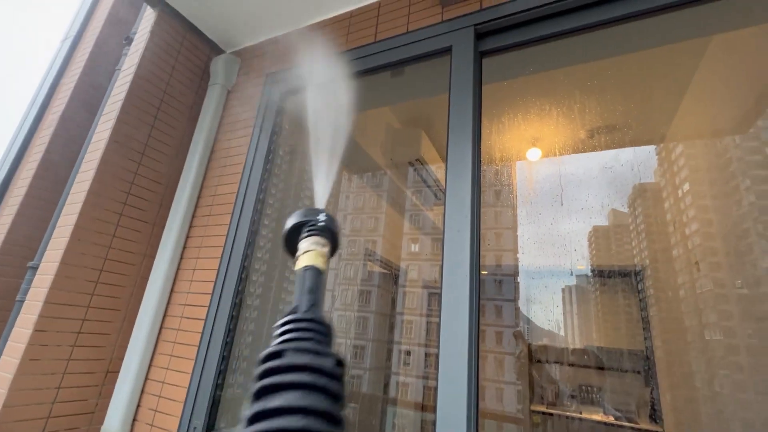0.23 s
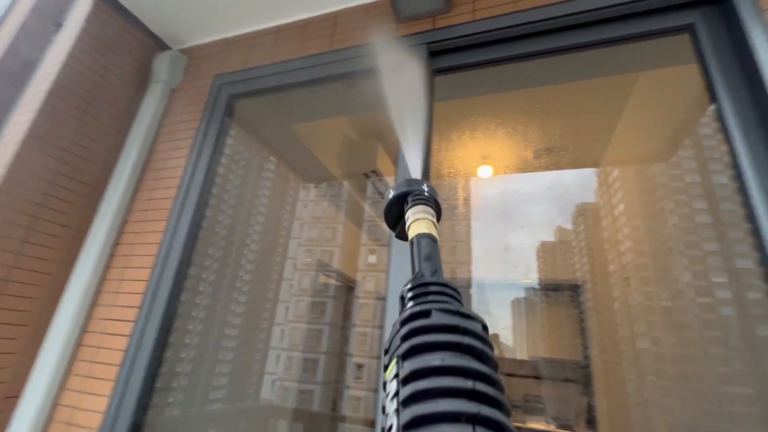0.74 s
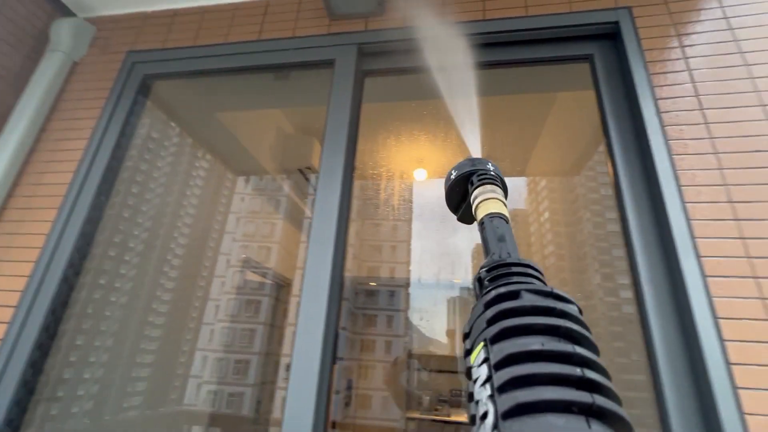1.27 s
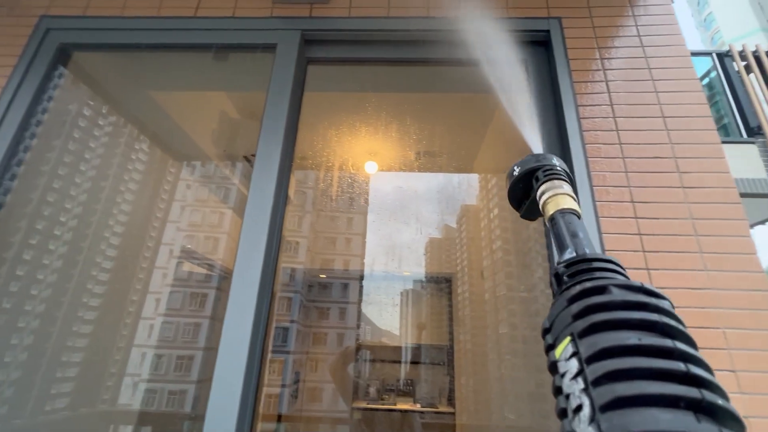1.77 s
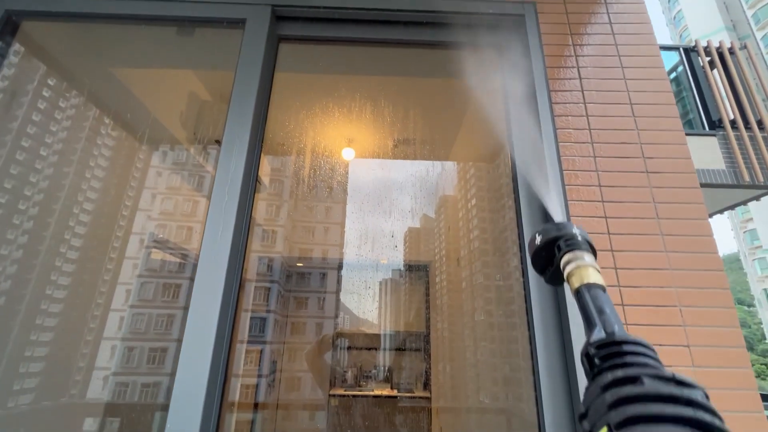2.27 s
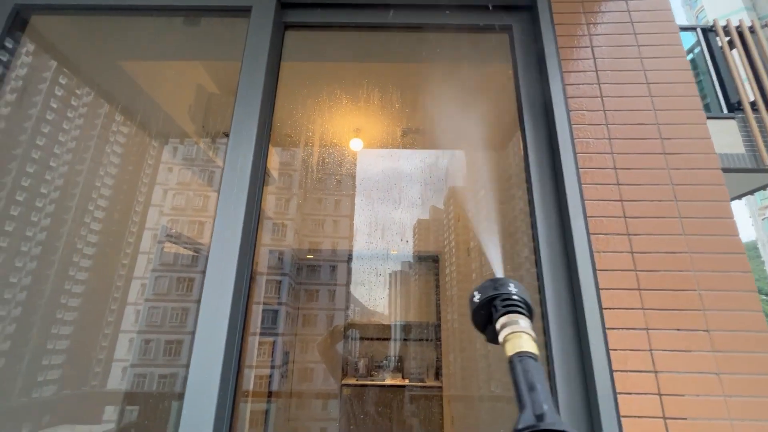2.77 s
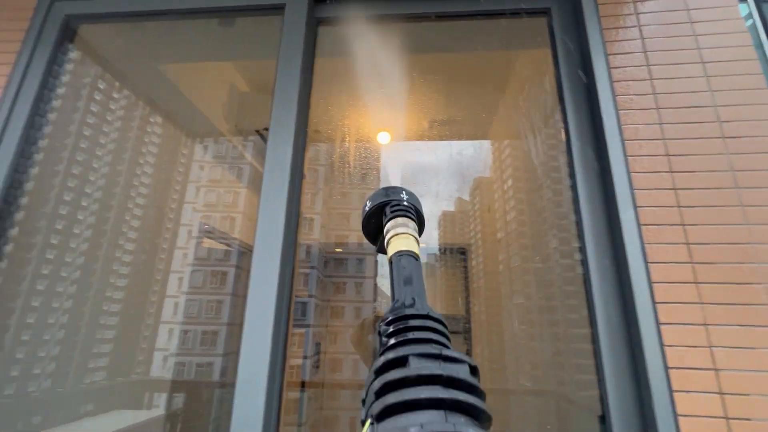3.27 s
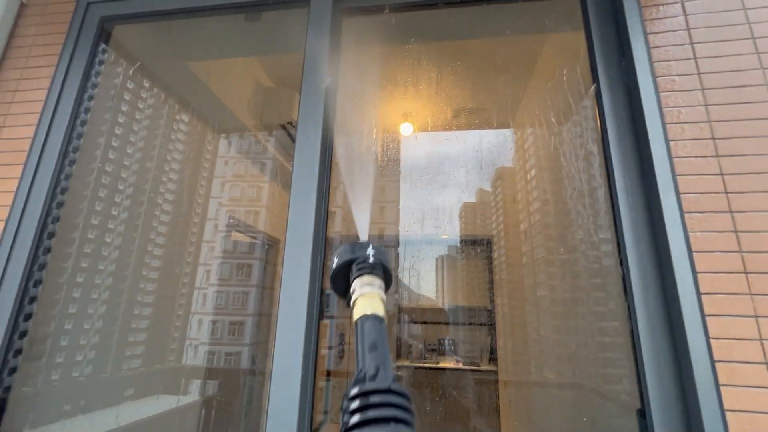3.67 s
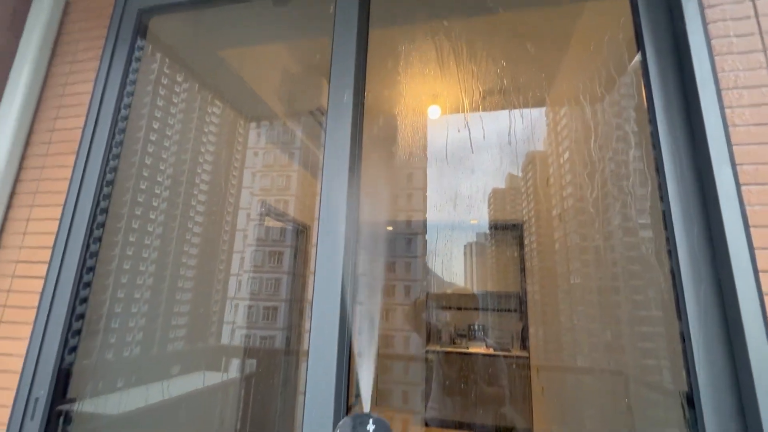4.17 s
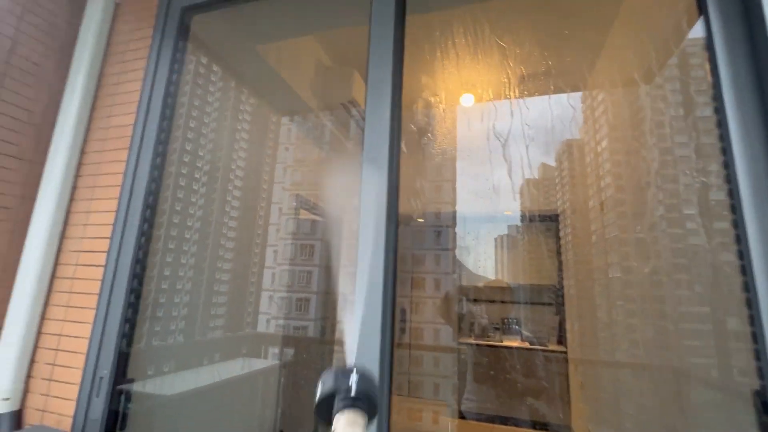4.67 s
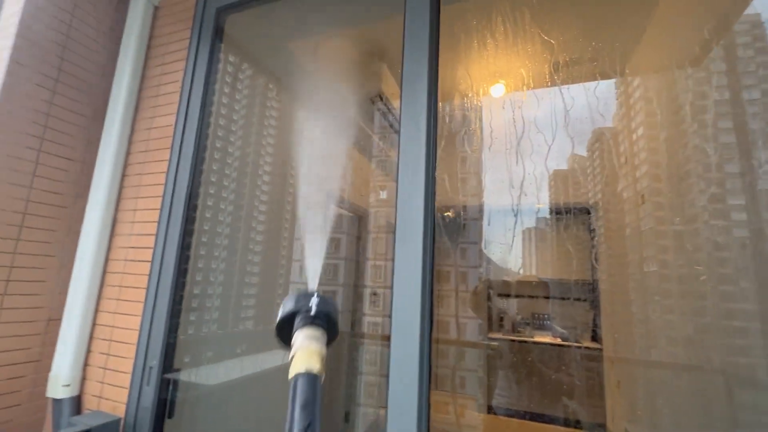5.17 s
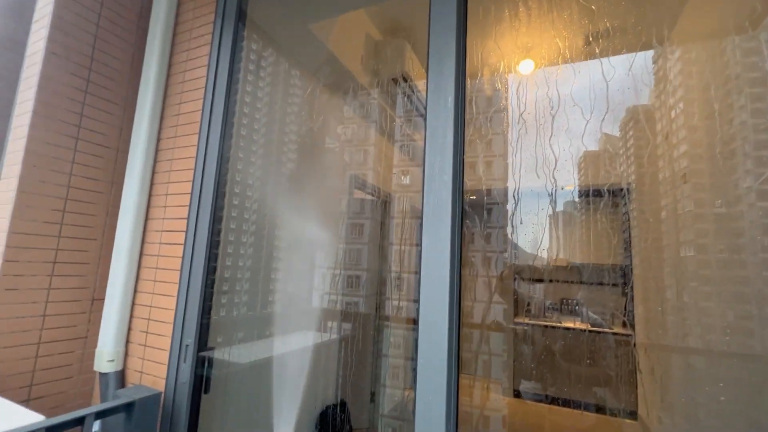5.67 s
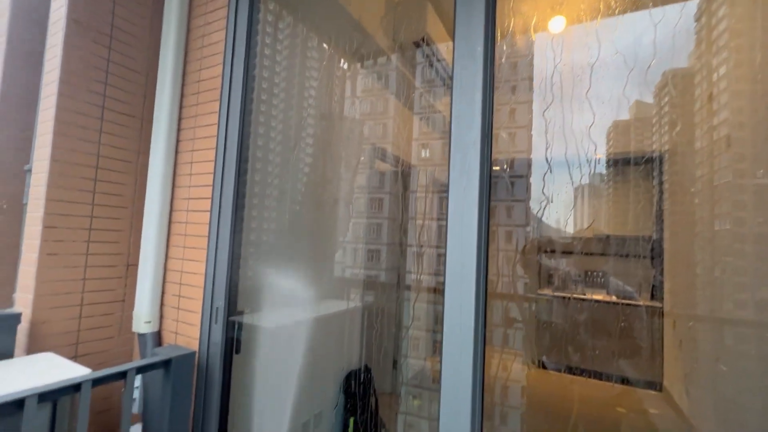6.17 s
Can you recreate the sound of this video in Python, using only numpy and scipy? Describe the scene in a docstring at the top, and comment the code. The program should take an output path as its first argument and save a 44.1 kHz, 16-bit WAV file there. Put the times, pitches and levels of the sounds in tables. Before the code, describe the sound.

Continuous pump noise and water spray, heard close outdoors by a moving stereo microphone. Rapid casing knocks alternate with brief falling whistles, one stronger than the other, over low hum, faint drone and rumble. Spray splashes brightly on a window at first, then weakens as a thin airy hiss rises. The knocking becomes duller, the whistles blurrier, and the pitch sags very slightly. Short reflections surround the machine.

```python
"""On a balcony, a two-piston electric pressure washer runs while its jet sweeps over window glass and frame.
Pump: each stroke knocks the casing, then a valve whistles briefly; the motor sounds lines locked to its speed.
Jet: shaped noise pulsing with the strokes. Behind it: stroke-rate hum, a steady drone and low rumble.
The hand-held microphone pair turns and drifts, so levels and the left-right delay change slowly.
"""
import sys
import numpy as np
from scipy import signal
from scipy.fft import rfft, irfft
from scipy.io import wavfile
from scipy.ndimage import uniform_filter1d, map_coordinates

SR = 44100
rng = np.random.default_rng(int(sys.argv[2]) if len(sys.argv) > 2 else 0)


def digitize_waveform(pressure):
    """Quantize a signal to 16-bit integers and store it at the path in sys.argv[1].

    Rows of a 2-D input are taken as channels; values are limited to [-1, 1].
    """
    field = np.atleast_2d(pressure).T
    bounded = np.clip(field, -1, 1)
    quanta = np.round(bounded * 32767).astype(np.int16)
    wavfile.write(sys.argv[1], SR, quanta)


N = 282857

# Crank speed, sagging as the battery drains: (time [s], speed [turns/s])
CRANK_SPEED = [(0.0, 28.28), (0.8, 28.13), (1.6, 27.998), (2.41, 27.907), (3.21, 27.825), (4.01, 27.699),
               (4.81, 27.66), (5.62, 27.543), (6.42, 27.473)]
# Two strokes of a turn, weaker whistle first:
# (knock angle [turn], knock level [dB], whistle angle [turn], share of whistle length [1])
STROKES = [(.04, -7, .25, .85), (.53, 0, .77, 1)]

# Microphone heading: (time [s], nominal delay of left port [ms], left minus right [dB])
HEADING = [(0, 0.084, 0.8), (.3, 0.16, .5), (.5, 0.24, -.5), (1.2, 0.25, -1), (2, 0.29, -1),
           (2.8, 0.24, -0.5), (3.6, 0.22, -.6), (4.2, 0.16, 0), (5.4, 0.16, -0.4), (6.42, 0.088, 0.8)]
# Pump as heard: (time [s], level re its average [dB])
PUMP_LEVEL = [(0, 5.5), (.25, 5.5), (.6, 6.5), (1, 4), (1.5, 3), (2, 3.5), (2.5, 1), (3, 1), (3.4, 1),
              (3.9, 0), (4.4, -1), (4.8, -3), (5.3, 0), (5.6, -4.5), (5.9, -2), (6.42, -5)]

# Motor lines and sidebands from the uneven load:
# (multiple of motor speed [1], plus multiple of crank speed [1], level [dB], column of MOTOR_LEVELS [index])
MOTOR_LINES = [(1, 0, -14, 0), (4, 0, -.5, 0), (4, -2, -9, 0), (8, -2, 0, 1), (8, 0, 0, 2), (8, 2, -8, 2),
               (16, -4, -1, 3), (16, -2, 1, 3), (16, 2, 1.5, 3), (16, 4, -4, 3)]
# Motor while the pair moves: (time [s], growl [dB], lower whine [dB], whine [dB], whizz [dB])
MOTOR_LEVELS = [(0, -49, -35, -42, -43), (.6, -50, -33, -41, -38), (1, -49, -35, -38, -37),
                (1.4, -45, -33, -35, -40), (1.8, -42, -37, -33, -41), (2.2, -46, -42, -37, -46),
                (2.6, -44, -40, -41, -45), (3, -44, -40, -40, -40), (3.4, -46, -47, -34, -39),
                (3.8, -45, -46, -40, -40), (4.2, -53, -47, -43, -39), (4.6, -59, -43, -37, -41),
                (5, -47, -40, -36, -35), (5.4, -58, -42, -42, -45), (5.8, -60, -43, -39, -54),
                (6.42, -63, -41, -41, -52)]
MOTOR_TURNS_PER_CRANK_TURN = 60 / 7

HUM_DB, HUM_DB_PER_PUMP_DB = -46.5, 0.33
DRONE_HZ, DRONE_DB = 131.3, -55
# Rumble spectrum, relative: (frequency [Hz], density [dB per Hz])
RUMBLE_SPECTRUM = [(20, -36), (45, -9.5), (100, -13), (200, -14.5), (400, -12.5), (800, -37)]
RUMBLE_DB = -48.5

# Jet: (time [s], splash on pane and frame re its average [dB], nozzle hiss re its average [dB])
JET_LEVELS = [(0, 6, -3), (.3, 6, -6), (.9, 5, -2), (1.4, 4, -1.5), (2, 2.5, -0.5), (2.5, 1, 1),
              (3.05, 2, 1), (3.6, 2.5, 0.5), (4, 1, 1), (4.5, -1, 6), (4.9, 1, 2.5), (5.3, 0, 3),
              (5.6, -2.5, 8), (6.42, -4.5, 10.5)]
# Spray spectrum, relative: (frequency [Hz], density [dB per Hz])
SPRAY_SPECTRUM = [(200, -25), (500, -9.5), (900, -3.5), (1250, 11), (1550, 13), (1850, 11), (2100, 6.5),
                  (2700, 5.5), (3600, 3.5), (5200, -4.5), (6000, 2), (6800, -4.5), (7300, -3.5),
                  (9000, -7.5)]
# How the spectrum follows the splash: (frequency [Hz], change [dB per dB of splash])
SPLASH_SHARE = [(200, -0.5), (850, 1.44), (1150, 1), (1500, 0.62), (2000, 0.86), (2500, 0.84), (3700, 0.62),
                (4600, 0.88), (6000, 0.47), (8500, 1.94), (11000, 1.5)]
# Splash ring, lower off axis: (heading delay [ms], centre [Hz], boost [dB])
SPLASH_RING = [(.09, 4560, 8), (.16, 4510, 7), (.19, 4150, 4.5), (.22, 3900, 4), (.28, 3880, 0.5)]
RING_WIDTH_HZ = 220  # centre to 1/e of the boost in dB
# Spectral offsets of pane drumming, mid hiss, fizz and fine mist
PANE_DB, MID_DB, FIZZ_DB, MIST_DB = -6.5, -7.5, -4, -19.5
SPRAY_DB = -23  # before the pulsing

# Knocking as heard: (time [s], level [dB])
KNOCK_LEVEL = [(0, -34), (1, -36), (2.1, -38.5), (2.4, -43), (3.6, -41.5), (4.4, -49), (5, -42),
               (5.5, -47.5), (6.42, -48)]
# Casing modes: (frequency [Hz], width [Hz], drive [dB], share of shading [1])
CASING_MODES = [(225, 25, -5, .1), (345, 60, -8, 0), (420, 30, -7, 0), (478, 20, -2, .6),
                (562, 12, -1.5, 1.2), (650, 16, -1, 1), (755, 14, 0, -.2), (1085, 70, 10, -.4),
                (1190, 30, 9, -.8), (1310, 80, 7, -.5), (1660, 150, 10, -.3), (2300, 300, 3, 0)]
# As the pair turns some modes fall into shadow, others open up: (time [s], shading at share 1 [dB])
SHADING = [(0, 0), (2.1, -1), (2.3, -10), (3.6, -10), (4, -13), (6.42, -13)]

# Whistle partials: (frequency [Hz], level [dB], nominal Gaussian sigma [ms], fall [Hz/ms], slow sag [Hz/s])
WHISTLE_PARTIALS = [(1478, 0, 3.3, 4, 0), (2995, 2, 4.2, 14, 17), (4550, -5, 3, 50, 0),
                    (5850, -7, 2.5, 70, 15)]
# Weaker stroke's whistle: (time [s], level re the stronger [dB])
WEAKER_WHISTLE = [(0, -2.5), (.25, -4.5), (.55, -8), (1.6, -7), (2.1, -5), (2.6, -4), (3.4, -6), (4.4, -2),
                  (4.9, -5.5), (5.3, -2), (6.42, -1.5)]
# Whistle as the pair moves: (time [s], stretch of length [1], puff re tone [dB], overtones re tone [dB])
WHISTLE_BLUR = [(0, .95, -22, -17), (.5, 1, -23, -13), (1.2, 1.05, -22, -9), (1.7, 1.2, -19, -6),
                (2.1, 1.3, -17, -5), (2.5, 1.2, -18, -7), (3.2, 1.25, -17, -8), (3.8, 1.25, -17, -9),
                (4.2, 1.25, -15, -11), (4.5, 1.25, -15, -18), (4.9, 1.15, -16, -16), (5.3, 1.1, -15, -17),
                (5.8, 1.3, -11, -14), (6.42, 1.35, -11, -17)]
WHISTLE_DB = -18.5  # at the average pump level

# Echoes re direct sound; they lose less than it when the pump is shadowed
ECHO_DB, ECHO_DB_PER_PUMP_DB, ECHO_T60_S = -12.5, -0.25, 0.055

# Likeness of noise at the two ports: (frequency [Hz], correlation [1])
PORT_LIKENESS = [(60, 1), (300, 0.29), (800, 0.22), (1400, 0.78), (3000, 0.43), (6000, 0.29), (8000, 0.4),
                 (11000, 1)]
# Treble phase, left against right: (frequency [Hz], share of heading delay [1], further lead of left [rad]);
# above 6.5 kHz the phase no longer follows the heading but runs along a fixed course
TREBLE_PHASE = [(4800, 1, 0), (6500, 0, -7.5), (8400, 0, -7), (16000, 0, 8)]
# Port colour: (frequency [Hz], left minus right [dB])
PORT_COLOUR = [(60, -0.2), (130, -0.5), (380, 4), (800, 1), (1400, -0.5), (1900, 5), (2400, 8), (2900, -2),
               (4300, -1.5), (5200, -8.5), (6600, -6), (8500, 0), (12000, 0.5)]
# Treble colour of both ports: (frequency [Hz], gain [dB])
MICROPHONE_COLOUR = [(9000, -1.5), (10200, -1), (11500, 5.5), (16000, 0.5)]
BAND_EDGE_HZ = 15900


def amp(db):
    """Amplitude factor from dB."""
    return 10 ** (np.asarray(db) / 20)


def evened(x):
    """Scale to unit RMS."""
    return x / np.sqrt(np.mean(x ** 2) + 1e-20)


def read(points, hz):
    """Interpolate a spectrum table over log frequency."""
    f, value = np.transpose(points)
    return np.interp(np.log(hz + 1), np.log(f + 1), value)


def follow(rows, t):
    """Interpolate every column linearly over the first."""
    s, *columns = np.transpose(rows)
    return [np.interp(t, s, c) for c in columns]


def bump(s, sigma_ms):
    """Gaussian pulse of unit peak; s in seconds."""
    return np.exp(-(1000 * s / sigma_ms) ** 2 / 2)


def resonate(x, hz, width_hz):
    """One damped mode struck by x: a two-pole resonator."""
    r = np.exp(-np.pi * width_hz / SR)
    angle = 2 * np.pi * hz / SR
    return signal.lfilter([0, np.sin(angle)], [1, -2 * r * np.cos(angle), r * r], x)


def heading(t):
    """Nominal delay of the left port in ms, and its lead in dB."""
    return follow(HEADING, t)


def noise(db_at, patchy_db, size):
    """Unit-RMS two-port noise from random short-time spectra with drifting patches."""
    hop = size // 4
    hz = np.fft.rfftfreq(size, 1 / SR)[:, None]
    t = np.arange(N // hop + 5) * hop / SR
    a, b, c, d, patches = rng.standard_normal((len(t), len(hz), 5)).T
    patches = uniform_filter1d(patches, size=5, axis=0)
    patches = evened(uniform_filter1d(patches, size=24, axis=1))

    likeness = np.clip(read(PORT_LIKENESS, hz), -1, 1)
    right = a + 1j * b
    share, lead_rad = follow(TREBLE_PHASE, hz)
    late = np.exp(1j * lead_rad - 2j * np.pi * hz * share * heading(t)[0] / 1000)
    left = likeness * right * late + np.sqrt(1 - likeness ** 2) * (c + 1j * d)

    spectra = np.array([left, right]) * amp(db_at(hz, t) + patchy_db * patches)
    return evened(signal.istft(spectra, nperseg=size, noverlap=size - hop)[1][:, :N])


def crank():
    """Crank angle in turns, integrated from its speed in turns/s; returns both."""
    speed = follow(CRANK_SPEED, np.arange(N) / SR)[0]
    return np.cumsum(speed) / SR, speed


def from_angle(at):
    """Seconds from the nearest moment when the crank passes this angle, and the number of that turn."""
    turns, speed = crank()
    turn = np.floor(turns - at + .5)
    return (turns - at - turn) / speed, (turn + 1).astype(int)


def motor():
    """Lines on the motor speed with load sidebands, wavering in level and phase, the growl most."""
    t = np.arange(N) / SR
    turns, out = crank()[0], np.zeros(N)
    levels_db = follow(MOTOR_LEVELS, t)
    for multiple, side, db, column in MOTOR_LINES:
        # growl is column 0
        rate_hz, phase_rad, waver_db = (15, .45, 2.3) if column else (35, 1.4, 4)
        draws = rng.standard_normal((2, 250))
        phase, level = [np.interp(t, np.arange(250) / rate_hz, v) for v in draws]
        cycles = (round(multiple) * MOTOR_TURNS_PER_CRANK_TURN + round(side)) * turns
        line = np.sin(2 * np.pi * cycles + phase_rad * phase)
        out += np.sqrt(2) * amp(db + waver_db * level + levels_db[round(column)]) * line
    return out


def hum():
    """Two strokes a turn shake the floor: a wavering sine, slightly later at the left port."""
    t = np.arange(N) / SR
    waver_db = 2.2 * np.interp(t, np.arange(70) / 10, rng.standard_normal(70))
    level_db = HUM_DB + HUM_DB_PER_PUMP_DB * follow(PUMP_LEVEL, t)[0] + waver_db
    angle = 4 * np.pi * (crank()[0] + .22)
    return np.sqrt(2) * amp(level_db) * np.cos(angle - [[.22], [0]])


def drone():
    """A steady sine from nearby."""
    return np.sqrt(2) * amp(DRONE_DB) * np.sin(2 * np.pi * DRONE_HZ * np.arange(N) / SR)


def rumble():
    """Low-frequency noise of fixed spectrum with drifting patches."""
    return amp(RUMBLE_DB) * noise(lambda hz, t: read(RUMBLE_SPECTRUM, hz), patchy_db=2.0, size=4096)


def jet():
    """Spray hiss that surges as each piston reverses; the mist follows less."""
    def spray_db(hz, t):
        """Spectrum over time from pane, mid hiss, fizz, mist and splash ring."""
        splash_db, nozzle_db = follow(JET_LEVELS, t)
        ring_hz, ring_db = follow(SPLASH_RING, heading(t)[0])
        pane = 1 / (1 + (hz / 1900) ** 6)
        mist = 1 / (1 + (10300 / (hz + 1)) ** 20)
        fizz = 1 / (1 + (6900 / (hz + 1)) ** 10) - mist
        mid = np.exp(-(np.log((hz + 1) / 2500) / 0.5) ** 2)
        ring = np.exp(-((hz - ring_hz) / RING_WIDTH_HZ) ** 2)
        parts_db = pane * PANE_DB + mid * MID_DB + fizz * FIZZ_DB + mist * MIST_DB + ring * ring_db
        moving_db = read(SPLASH_SHARE, hz) * splash_db + (fizz + mist) * nozzle_db
        return read(SPRAY_SPECTRUM, hz) + parts_db + moving_db

    spray = noise(spray_db, patchy_db=1.19, size=512)
    mist = signal.sosfiltfilt(signal.butter(3, 7000, "high", fs=SR, output="sos"), spray)
    surge_db = 3.6 * bump(from_angle(.55)[0], 2) + 2.2 * bump(from_angle(.06)[0], 2)
    # pressure sags between surges
    slack_db = -2 * bump(from_angle(.44)[0], 1.2) - 1.2 * bump(from_angle(.16)[0], 1.2)
    pulse_db = surge_db + slack_db
    pulsing = amp(pulse_db) * (spray - mist) + amp(.4 * pulse_db) * mist
    return amp(SPRAY_DB) * pulsing


def knocks():
    """The pistons reverse with a click and a short rattle that ring the casing modes; unit RMS."""
    blows = np.zeros(N)
    for at, db, *_ in STROKES:
        s, turn = from_angle(at)
        size = amp(db + 1.6 * rng.standard_normal(turn[-1] + 1))[turn]
        # s jumps from - to + as the crank passes the angle
        click = np.diff(np.sign(s), prepend=0) > 1
        rattle = 0.01 * bump(s, 2) * rng.standard_normal(N)
        blows += size * (click + rattle)
    shade_db = follow(SHADING, np.arange(N) / SR)[0]
    rings = np.zeros(N)
    for hz, width_hz, db, share in CASING_MODES:
        rings += amp(db + share * shade_db) * resonate(blows, hz, width_hz)
    # a small casing radiates no bass
    bass_cut = signal.butter(4, 190, "high", fs=SR, output="sos")
    return evened(signal.sosfilt(bass_cut, rings))


def whistle(tone_db, weaker_db):
    """About half a turn apart, a short falling tone swells and fades within a wider puff of breathy noise."""
    out, t = np.zeros(N), np.arange(N) / SR
    stretch, puff_db, overtones_db = follow(WHISTLE_BLUR, t)
    puff = evened(resonate(resonate(rng.standard_normal(N), 1480, 205), 1480, 205))
    for (_, _, at, share), stroke_db in zip(STROKES, (weaker_db, 0)):
        s, turn = from_angle(at)
        # no two whistles are quite alike
        size, slip, length = rng.standard_normal((turn[-1] + 1, 3))[turn].T
        out += amp(stroke_db + tone_db + puff_db) * bump(s, 7) * puff
        for k, (hz, part_db, sigma_ms, fall, sag) in enumerate(WHISTLE_PARTIALS):
            # 500 * fall: Hz/ms to Hz/s, halved by integrating to phase
            cycles = (hz - sag * t - 500 * fall * s) * s
            tone = np.sin(2 * np.pi * cycles + (.1 + .05 * k) * slip)
            swell = bump(s, share * sigma_ms * stretch * np.exp(.05 * length))
            balance_db = overtones_db + .4 * stroke_db if k else stroke_db
            out += amp(tone_db + part_db + balance_db + .9 * size) * swell * tone
    return out


def balcony(x):
    """Direct sound, later at the left port, plus close echoes that change as the microphone moves."""
    n = np.arange(N)
    delay_ms = 0.71 * heading(n / SR)[0]
    left = map_coordinates(x, [n - delay_ms * SR / 1000], order=3)
    out, t = np.array([left, x]), np.arange(5000) / SR
    wet = amp(ECHO_DB + ECHO_DB_PER_PUMP_DB * follow(PUMP_LEVEL, n / SR)[0])
    # crossfade three sparse echo patterns
    for k in range(3):
        taps = rng.standard_normal((2, len(t))) * (rng.random((2, len(t))) < .05)
        taps *= amp(-60 * t / ECHO_T60_S)
        taps[0] += .3 * taps[1]  # the ports share part of the echoes
        taps /= np.linalg.norm(taps[1])
        share = np.sqrt(2 / 3) * np.cos(np.pi * (0.44 * n / SR + k / 3))
        out += wet * signal.oaconvolve((share * x)[None], taps, axes=1)[:, :N]
    return out


def scene():
    """Pump sounds pass through the balcony echoes; hum, drone, rumble and jet add directly."""
    t = np.arange(N) / SR
    whistle_db = WHISTLE_DB + follow(PUMP_LEVEL, t)[0]
    weaker_db = follow(WEAKER_WHISTLE, t)[0]
    knock_db = follow(KNOCK_LEVEL, t)[0]
    pump = whistle(whistle_db, weaker_db) + motor() + amp(knock_db) * knocks()
    return balcony(pump) + hum() + drone() + rumble() + jet()


def record(dry):
    """Each port has its own colour and faces the scene more or less; then the band limit."""
    hz = np.fft.rfftfreq(N, 1 / SR)
    half_db = read(PORT_COLOUR, hz) / 2
    colour_db = read(MICROPHONE_COLOUR, hz) + [half_db, -half_db]
    facing_db = heading(np.arange(N) / SR)[1] / 2
    ports = irfft(rfft(dry) * amp(colour_db), N) * amp([facing_db, -facing_db])
    band_limit = signal.firwin(511, BAND_EDGE_HZ, window=("kaiser", 9), fs=SR)
    return signal.oaconvolve(ports, band_limit[None], "same")


dry = scene()
out = record(dry)
digitize_waveform(out)
```